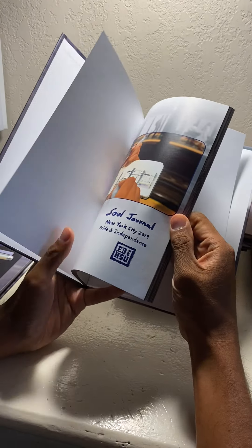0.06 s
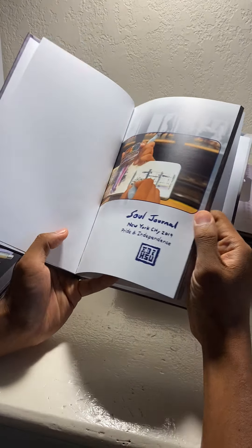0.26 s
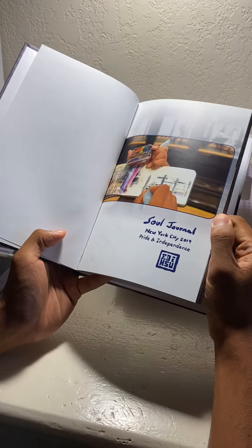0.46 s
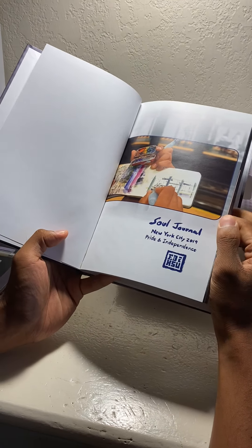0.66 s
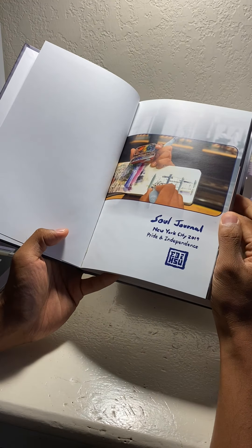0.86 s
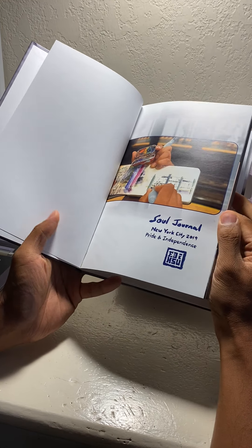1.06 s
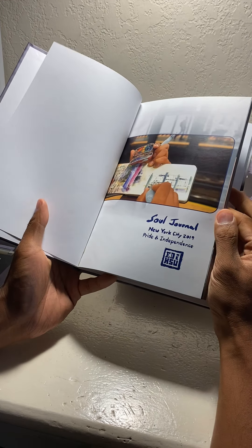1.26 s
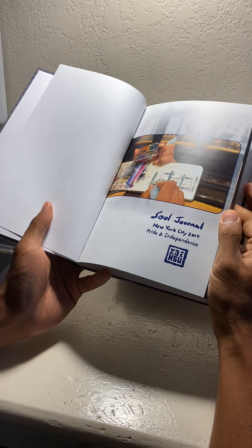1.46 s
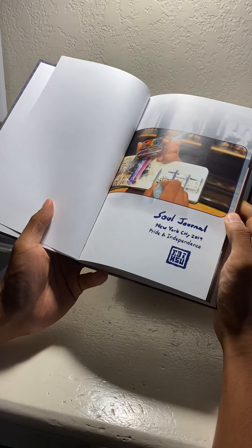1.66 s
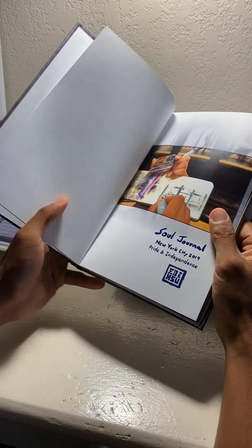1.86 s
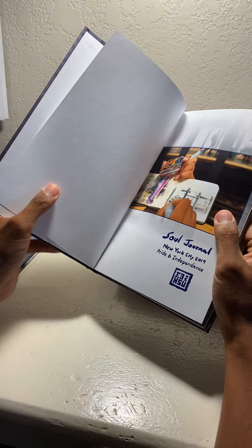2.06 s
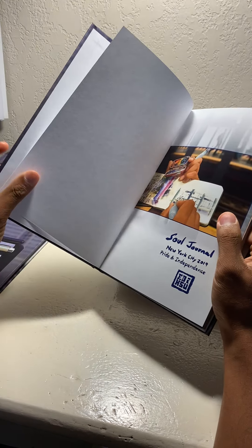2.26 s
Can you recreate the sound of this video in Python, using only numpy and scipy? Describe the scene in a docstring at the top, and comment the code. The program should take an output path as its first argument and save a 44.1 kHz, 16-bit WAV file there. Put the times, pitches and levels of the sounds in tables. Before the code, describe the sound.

One sharp, dry spine crack from an opening hardcover book, then pages rustle and settle quietly

```python
"""Hands rub the covers of a hardcover book, dully, over the faint air of a small, quiet room.
Paper then slides as the book opens close to a microphone: thousands of tiny slips, shaped into hiss.
Flexing sheets give soft pops whose treble arrives before their bass, and the spine cracks sharply once.
The pages settle with dry ticks, a thumb rubs the paper, and the left half is lifted. A near wall adds short
echoes to the crack; the room adds a fading noise tail to all but the air, faintest after the crack."""
import sys
import numpy as np
from scipy import signal
from scipy.fft import rfft, irfft
from scipy.io import wavfile
from scipy.ndimage import uniform_filter1d

SR = 44100
rng = np.random.default_rng(int(sys.argv[2]) if len(sys.argv) > 2 else 0)


def int16_out(signal):
    """Quantize to a 16-bit WAV file."""
    q = np.round(np.clip(np.atleast_2d(signal).T, -1, 1) * 32767)
    wavfile.write(sys.argv[1], SR, q.astype(np.int16))


N = 101429  # length in samples
HZ, TIME = np.fft.rfftfreq(N, 1 / SR), np.arange(N) / SR


def amp(db):
    """Turns decibels into a gain."""
    return 10 ** (np.asarray(db) / 20)


def unit(x):
    """Scales a signal to an average (rms) strength of 1."""
    return x / np.sqrt(np.mean(x ** 2) + 1e-30)


def read(points, hz=HZ):
    """Reads a table in between its points, with frequency on a log scale."""
    f, value = np.transpose(points)
    return np.interp(np.log(hz + 1), np.log(f + 1), value)


def shape(x, gain):
    """Filters a sound by giving each frequency its own gain."""
    return irfft(rfft(x) * gain, N)


def noise(colour):
    """Noise with the given colour, at rms 1."""
    return unit(shape(rng.standard_normal(N), amp(read(colour))))


def bell(peak, length):
    """A smooth swell, loudest at the time peak, down to 14 percent one length away on either side."""
    return np.exp(-2 * ((TIME - peak) / length) ** 2)


# colour of the still air [f/Hz, level/dB]
AIR_COLOUR = [(25, -23), (57, 1.5), (80, -2.5), (250, -19.5), (720, -14), (1150, -24.5), (10000, -55)]
AIR_DB = -70.5


def air():
    """Quiet room noise, alike at both ports only in the bass."""
    apart = np.clip(HZ / 1200, 0, 1)
    mid = noise(AIR_COLOUR)
    side = shape(noise(AIR_COLOUR), apart)
    return amp(AIR_DB) * np.array([mid + side, mid - side])


# loudness of the hands rubbing the covers [t/s, level/dB]
COVER_LEVELS = [(0, -62.5), (.08, -72), (.18, -61), (.26, -57.5), (.33, -65), (.47, -60.5), (.65, -68),
                (1.0, -71.5), (1.15, -79), (1.31, -66.5), (1.72, -73.5), (1.82, -65), (1.93, -73.5),
                (1.97, -55.5), (2.06, -61.5), (2.3, -76.5)]
# colour of that rubbing [f/Hz, level/dB]
COVER_COLOUR = [(40, -31.5), (120, -0.5), (200, -4.5), (320, -1), (800, -7), (1500, -35)]
# low thuds as the book shifts its weight [loudest at t/s, length/s, level/dB]
WEIGHT_THUDS = [(0.036, 0.066, -64), (0.492, 0.054, -62), (1.98, 0.05, -63)]
# colour of the thuds [f/Hz, level/dB]
THUD_COLOUR = [(25, -21), (60, 4), (400, -49)]


def hands():
    """Palms rub the covers (dull noise) and the weight of the book shifts (brief swells of deep noise)."""
    rubbing = noise(COVER_COLOUR) * amp(np.interp(TIME, *np.transpose(COVER_LEVELS)))
    swells = sum(amp(db) * bell(peak, length) for peak, length, db in WEIGHT_THUDS)
    return rubbing + swells * noise(THUD_COLOUR)


WANDER_DB = 2.5  # rms depth of the peaks and dips


def wander(x):
    """The sheet's resonances wander as the contact moves: random peaks and dips come and go."""
    z = signal.stft(x, nperseg=512, noverlap=384)[2]
    field = uniform_filter1d(rng.standard_normal(z.shape), 12, axis=1)  # smooth over 12 time frames
    field = uniform_filter1d(field, 4, axis=0)  # and over 4 frequency bins
    return signal.istft(z * amp(WANDER_DB * unit(field)), nperseg=512, noverlap=384)[1][:N]


SLIPS_PER_S, SLIP_SPREAD_DB = 7000, 2.5  # how many slips, and how unequal in size
FLUTTER_DB, FLUTTER_S = 1.32, .012  # rms depth and smoothing time of the loudness flutter
MIDDLE_DB, TREBLE_DB, FIZZ_DB = -.5, 1.5, -3.0  # added to the levels of the three bands
# colour of the finest hiss [f/Hz, level/dB]
FIZZ_COLOUR = [(5500, -17.5), (8000, -9), (15500, 1)]


def slide(movement, colour):
    """Paper on paper: thousands of tiny slips a second ring the sheets, in three bands of changing level."""
    t, *levels = np.transpose(movement)
    sizes = amp(SLIP_SPREAD_DB * np.minimum(rng.exponential(1, N), 4))
    happens = rng.random(N) < SLIPS_PER_S / SR
    slips = sizes * rng.choice([-1, 1], N) * happens
    flutter = unit(uniform_filter1d(rng.standard_normal(N), int(FLUTTER_S * SR)))
    slips = wander(slips) * amp(FLUTTER_DB * flutter)

    paper = amp(read(colour)) * HZ ** 2 / (HZ ** 2 + 350 ** 2)  # bass falls away below 350 Hz
    upper = 1 / (1 + (2600 / (HZ + 1)) ** 8)  # middle meets treble at 2600 Hz
    bands = [(paper * (1 - upper), MIDDLE_DB),
             (paper * upper / (1 + (HZ / 8500) ** 10), TREBLE_DB),
             (amp(read(FIZZ_COLOUR)), FIZZ_DB)]
    layers = 0
    for (gain, trim_db), level in zip(bands, levels):
        layers = layers + unit(shape(slips, gain)) * amp(trim_db + np.interp(TIME, t, level))

    # 10 ms equal-power fades join one movement to the next
    inside = np.minimum(TIME - t[0], t[-1] - TIME)
    return np.clip(inside / .01 + .5, 0, 1) ** .5 * layers


# Loudness of each movement, before the band trims above
# [t/s, middle level/dB, treble level/dB, finest hiss level/dB]
# paper slides as the book opens
OPENING_LEVELS = [(0, -74.5, -82, -94), (.05, -82.5, -86, -87), (.11, -67, -69, -63), (.115, -56, -59, -68),
                  (.165, -52.5, -53.5, -59.5), (.204, -55, -55.5, -51), (.214, -40.5, -45.5, -50.5),
                  (.232, -49, -51.5, -51), (.28, -50.5, -50.5, -57.5), (.3, -52, -55, -62.5),
                  (.42, -56, -59, -58)]
# the pages settle under the hands
SETTLING_LEVELS = [(.42, -53.5, -59.5, -57), (.478, -55, -61, -57.5), (.514, -49.5, -56.5, -64.5),
                   (.615, -61, -69.5, -66), (.654, -56, -60, -54.5), (.72, -54.5, -61, -60.5),
                   (.745, -75, -71.5, -64), (.775, -55.5, -68, -70), (.81, -69.5, -75, -73),
                   (.86, -65.5, -65.5, -80), (.885, -74, -85, -90), (.93, -82, -89.5, -92)]
# a thumb slides over the page
THUMB_LEVELS = [(.93, -74, -83, -87.5), (.97, -66, -73.5, -79.5), (1.035, -70, -81, -86),
                (1.102, -58, -61, -63.5), (1.156, -56, -57, -57.5), (1.2, -60.5, -63, -62),
                (1.32, -56.5, -62, -61), (1.362, -89, -85, -86), (1.378, -58, -65, -78),
                (1.504, -68, -69.5, -67.5), (1.528, -54, -60, -65), (1.56, -68, -69, -69),
                (1.64, -77, -77, -63.5), (1.72, -81, -81.5, -87)]
# the left half is lifted
LIFTING_LEVELS = [(1.72, -79, -82.5, -82), (1.754, -73, -65, -63), (1.826, -68, -65, -57),
                  (1.938, -63.5, -61.5, -57.5), (1.96, -50.5, -54, -49.5), (2.035, -53.5, -55.5, -48),
                  (2.055, -55, -61.5, -58), (2.104, -63.5, -63, -62.5), (2.18, -60, -57.5, -50.5),
                  (2.226, -67.5, -67.5, -65), (2.242, -57.5, -58.5, -56.5), (2.3, -58.5, -57, -46)]
# colour of each movement's middle and treble [f/Hz, level/dB]
OPENING_COLOUR = [(300, -13), (900, -6.5), (1450, -1.5), (2250, -3), (2700, -7.5), (3200, -4.5),
                  (4500, -5.5), (6000, -11.5), (8000, -9)]
SETTLING_COLOUR = [(300, -16), (680, -2.5), (1000, -10), (1350, -2), (1750, -1), (2200, -9.5), (2800, -14),
                   (3300, -14), (8000, -15.5)]
THUMB_COLOUR = [(300, -11.5), (650, -4), (950, -5), (1300, -0.5), (1600, -6.5), (1900, -1.5), (2400, -9.5),
                (3500, -11), (8000, -13)]
LIFTING_COLOUR = [(300, -7.5), (1000, -5), (1250, 0.5), (1600, -4.5), (2000, 0), (2700, -10), (3450, -4),
                  (4100, -10.5), (8000, -7.5)]


def rustle():
    """The four movements of the pages, each a stretch of sliding paper with its own colour."""
    opening = slide(OPENING_LEVELS, OPENING_COLOUR)
    settling = slide(SETTLING_LEVELS, SETTLING_COLOUR)
    thumb = slide(THUMB_LEVELS, THUMB_COLOUR)
    lifting = slide(LIFTING_LEVELS, LIFTING_COLOUR)
    return opening + settling + thumb + lifting


# scrapes that ring one resonance of the sheet [loudest at t/s, length/s, level/dB, centre f/Hz]
SCRAPE_EVENTS = [(.16, .04, -54.5, 3000), (0.516, 0.031, -52.5, 1750), (1.422, 0.062, -60, 1290),
                 (1.829, 0.077, -62, 2200), (1.865, 0.068, -62, 880), (1.9, 0.054, -62.5, 4620),
                 (2.072, 0.013, -53, 3500)]
SCRAPE_WIDTH = 0.053  # share of the centre frequency


def scrapes():
    """A fingertip or a page edge catches and rings one narrow resonance for a moment."""
    out = np.zeros(N)
    for peak, length, db, centre in SCRAPE_EVENTS:
        resonance = 1 / (1 + ((HZ / centre - 1) / SCRAPE_WIDTH) ** 2)
        ring = unit(shape(rng.standard_normal(N), resonance))
        out += ring * amp(db) * bell(peak, length)
    return out


def bending_wave(start, gain, lag):
    """A snap of unit energy that crossed a sheet: its delay falls with the root of frequency (lag at 1 kHz)."""
    turns = HZ * start + 2 * lag * np.sqrt(1000 * HZ)
    wave = irfft(gain * np.exp(-2j * np.pi * turns), N)
    return wave / np.linalg.norm(wave)


def shudder(db, t60):
    """Spectrum of a dense train of tiny slips that dies by 60 dB in t60 seconds."""
    train = rng.standard_normal(N) * amp(-60 * TIME / t60)
    return amp(db) * rfft(train / np.linalg.norm(train))


# soft pops of flexing sheets, before the edge levels [t/s, level/dB, centre f/Hz, lag at 1 kHz/s]
POP_EVENTS = [(.217, -26, 700, .003), (.4385, -21, 430, .006), (.451, -27, 283, .005),
              (.698, -21.5, 466, .003), (0.7022, -27.5, 1570, .002), (0.9663, -25, 570, 0.008),
              (1.873, -30, 920, .004), (2.0845, -20, 760, .009), (2.131, -30, 694, .003)]
# direct wave, then its return from the sheet's edges [path as a multiple of the direct one, level/dB]
EDGE_PATHS = [(1, -1.5), (1.599, -9.5)]
POP_OCTAVES, POP_SKIRT_DB = 0.47, -27  # width of the pop's main hump, level of its wide skirt
POP_ROUGH_DB, POP_ROUGH_S = -3, .03  # level and t60 of the slips that roughen it


def pops():
    """A bowed sheet flips over: a soft, rough pop that sweeps downward and returns lower from the edges."""
    out = np.zeros(N)
    for start, db, centre, lag in POP_EVENTS:
        for path, edge_db in EDGE_PATHS:
            octaves = np.log2((HZ + 1) / centre * path)
            hump = np.exp(-.5 * (octaves / POP_OCTAVES) ** 2)
            skirt = amp(POP_SKIRT_DB) / (1 + (octaves / 2) ** 4)
            rough = 1 + shudder(POP_ROUGH_DB, POP_ROUGH_S)
            out += amp(db + edge_db) * bending_wave(start, (hump + skirt) * rough, lag * path)
    return out


def sudden(colour):
    """Gives a colour the phase of a sharp front followed by ringing (nothing sounds before the hit)."""
    cepstrum = irfft(np.log(amp(read(colour))), N)
    return np.exp(rfft(cepstrum * (1 + np.sign(np.fft.fftfreq(N)))))


SNAP_LAG_S = 0.0008  # lag at 1 kHz, for cracks and ticks
# cracks of the spine, before CRACK_DB is added [t/s, level/dB]
CRACK_EVENTS = [(0.2492, -22), (0.2571, 0), (0.279, -26.5)]
CRACK_DB = 0.9
# colour of the cracks [f/Hz, level/dB]
CRACK_COLOUR = [(350, -24.5), (800, -11), (1450, -1.5), (1900, 3), (2600, -10.5), (3200, 2.5), (4300, 1),
                (6300, -11.5), (10000, -8.5), (15500, -24.5)]
# echoes from near surfaces, before dulling [delay/s, level/dB]
NEAR_ECHOES = [(.0014, -18), (.0028, -16), (.0037, -15)]
ECHO_DULL_HZ = 6030  # echoes and tail lose treble above this
CRACK_TAIL_DB, CRACK_TAIL_S = -11.5, .018  # level and t60 of the shuddering pages


def spine():
    """The glued spine gives with small ticks and one sharp crack; pages shudder, covers and wall echo dully."""
    front = sudden(CRACK_COLOUR)
    snaps = sum(amp(CRACK_DB + db) * bending_wave(start, front, SNAP_LAG_S) for start, db in CRACK_EVENTS)
    echoes = sum(amp(db) * np.exp(-2j * np.pi * HZ * delay) for delay, db in NEAR_ECHOES)
    # the shudder starts together with the first echo
    pages = shudder(CRACK_TAIL_DB, CRACK_TAIL_S) * np.exp(-2j * np.pi * HZ * NEAR_ECHOES[0][0])
    dull = 1 / (1 + (HZ / ECHO_DULL_HZ) ** 4)
    return shape(snaps, 1 + (echoes + pages) * dull)


# ticks of page edges [t/s, level/dB]
TICK_EVENTS = [(.536, -30), (.792, -33), (.852, -35.5), (.936, -39), (1.376, -38), (1.616, -37),
               (1.692, -41.5)]
# colour of the ticks [f/Hz, level/dB]
TICK_COLOUR = [(300, -11), (1500, 2.5), (9000, -24.5)]
TICK_T60_S = 0.027


def ticks():
    """Page edges catch and let go: small dry ticks, each a burst of tiny slips that dies quickly."""
    out = np.zeros(N)
    for start, db in TICK_EVENTS:
        burst = amp(read(TICK_COLOUR)) * shudder(0, TICK_T60_S)
        out += amp(db) * bending_wave(start, burst, SNAP_LAG_S)
    return out


# how far the left port leads the right [f/Hz, phase/radians]
LEFT_LEAD = [(400, 0), (850, -1.7), (1450, 0), (2100, 0), (3400, 1.19), (5700, 1.5), (8300, 3.0),
             (11500, 3), (16000, 9)]
# left minus right [f/Hz, level/dB]
LEFT_MINUS_RIGHT = [(100, -1), (500, 4.5), (1400, -3), (2600, -1.5), (4500, -2.5), (8000, -0.5)]


def ports(x):
    """One sound at the two microphone ports: phase and level differences are split evenly between them."""
    half = np.exp(.5j * read(LEFT_LEAD)) * amp(read(LEFT_MINUS_RIGHT) / 2)
    return shape(x, np.array([half, 1 / half]))


# time for the room's tail to fade by 60 dB [f/Hz, t60/s]
ROOM_FADE = [(150, 0.38), (4000, 0.12), (15000, 0.033)]


def room(x, wet_db):
    """Direct sound plus a short diffuse tail: noise that differs at each port, its treble fading fastest."""
    hz, t, z = signal.stft(rng.standard_normal((2, SR // 2)), SR, nperseg=256)
    fade = amp(-60 * t / read(ROOM_FADE, hz)[:, None])
    z = z * fade * (t > .004)  # frames up to 4 ms stay empty
    tail = signal.istft(z, SR, nperseg=256)[1]
    tail = tail / np.linalg.norm(tail[0])
    return ports(x) + amp(wet_db) * signal.fftconvolve(x[None], tail, axes=1)[:, :N]


def scene():
    """The book in its room, each group of sounds with its own amount of tail."""
    covers = room(hands(), wet_db=-15.5)
    paper = room(rustle() + scrapes() + ticks(), wet_db=-14.5)
    flexing = room(pops(), wet_db=-14.0)
    cracking = room(spine(), wet_db=-24.0)
    return air() + covers + paper + flexing + cracking


CUTOFF_HZ = 15950


def record(dry):
    """The recorder's band limit: a steep low-pass filter removes the highest treble."""
    lowpass = signal.firwin(511, CUTOFF_HZ, window=("kaiser", 9), fs=SR)
    return signal.oaconvolve(dry, lowpass[None], "same")


dry = scene()
out = record(dry)
int16_out(out)
```